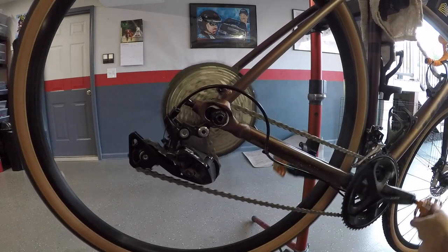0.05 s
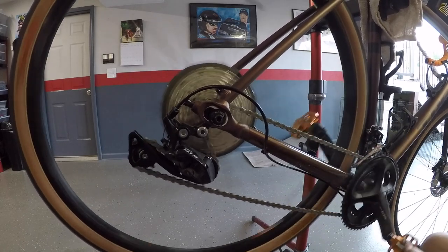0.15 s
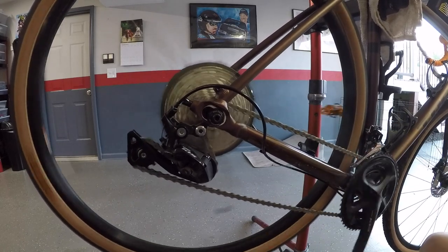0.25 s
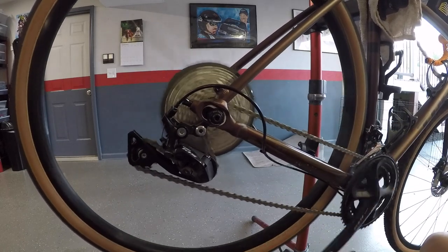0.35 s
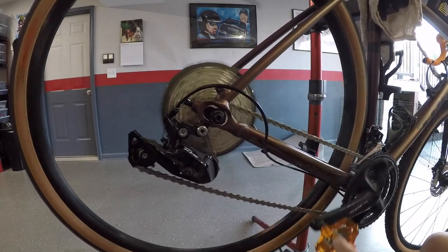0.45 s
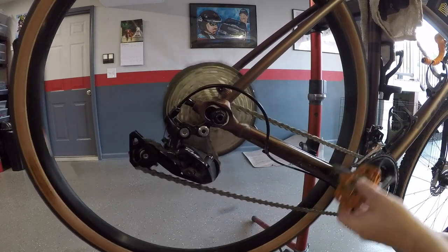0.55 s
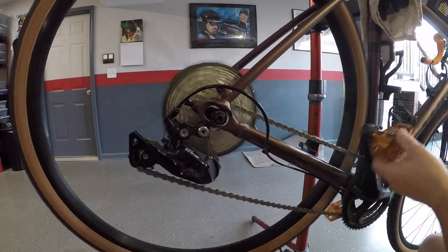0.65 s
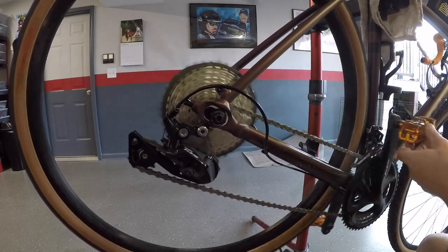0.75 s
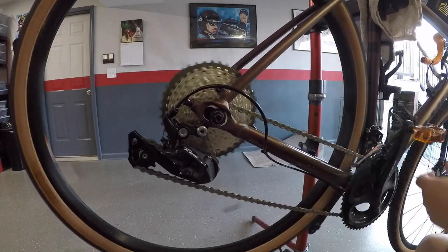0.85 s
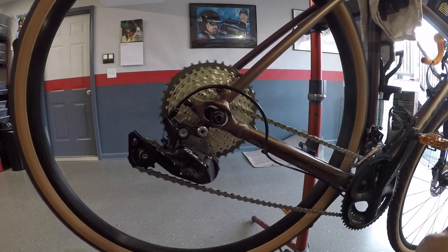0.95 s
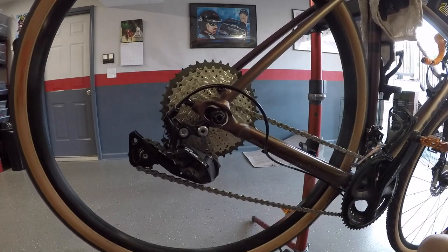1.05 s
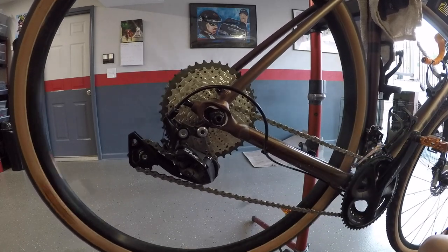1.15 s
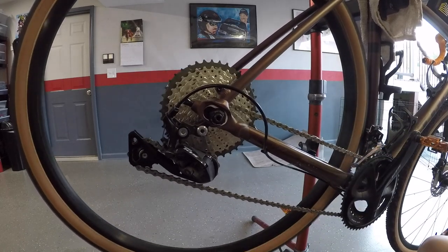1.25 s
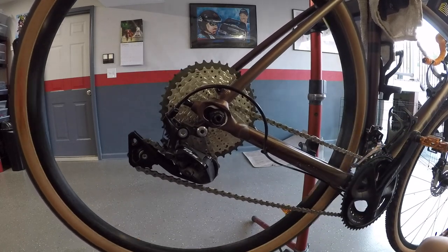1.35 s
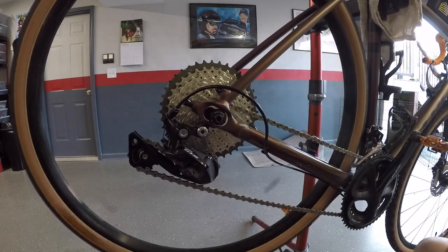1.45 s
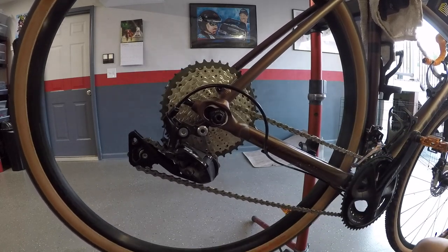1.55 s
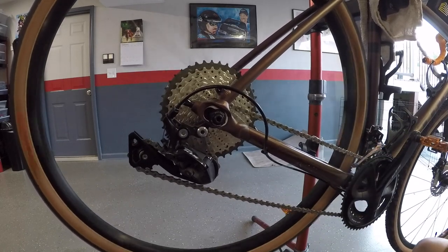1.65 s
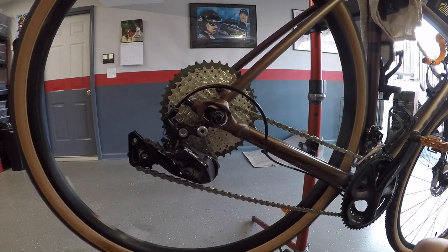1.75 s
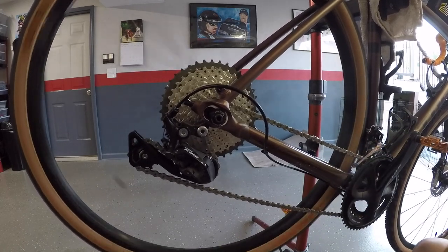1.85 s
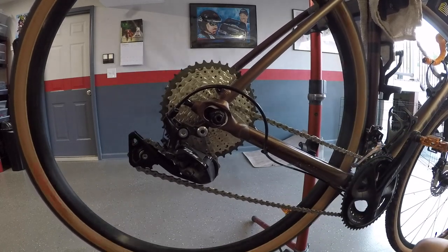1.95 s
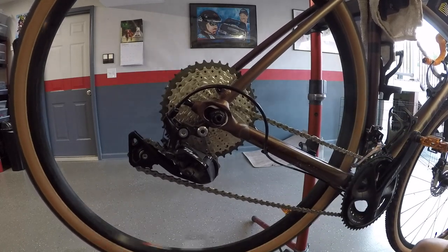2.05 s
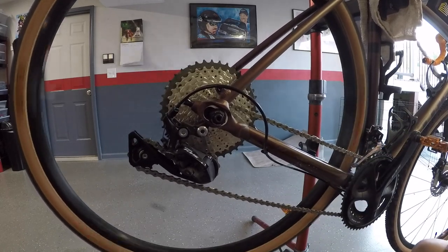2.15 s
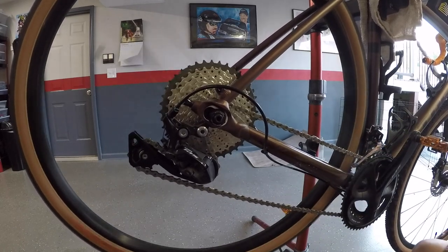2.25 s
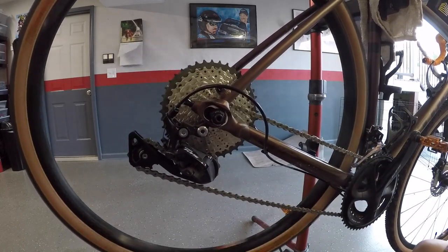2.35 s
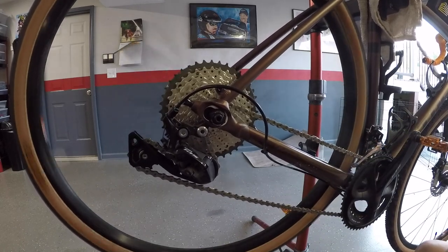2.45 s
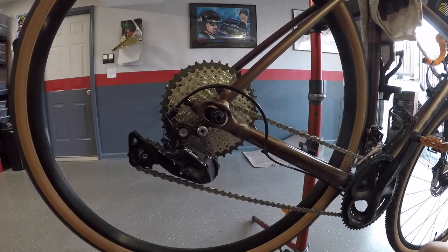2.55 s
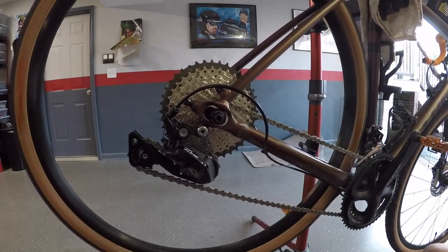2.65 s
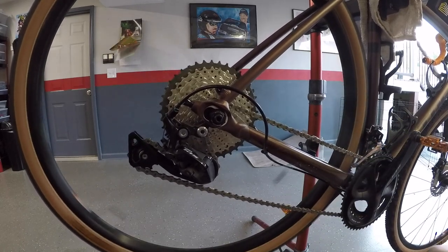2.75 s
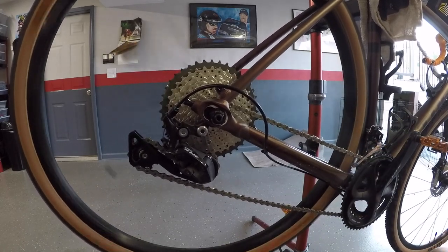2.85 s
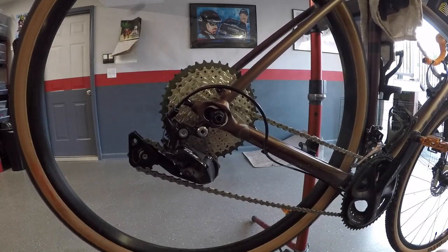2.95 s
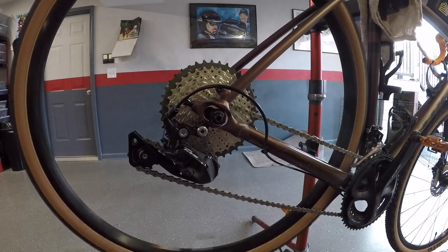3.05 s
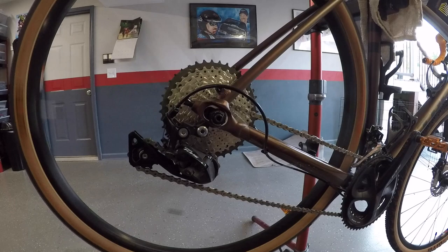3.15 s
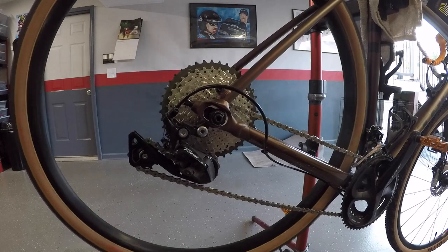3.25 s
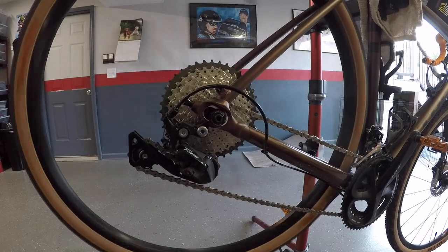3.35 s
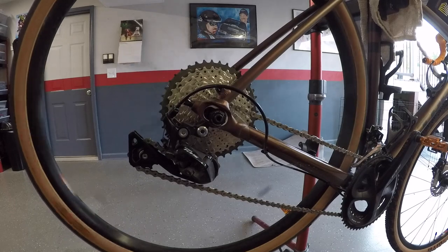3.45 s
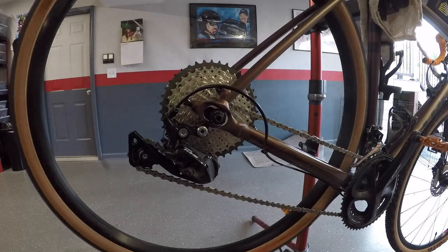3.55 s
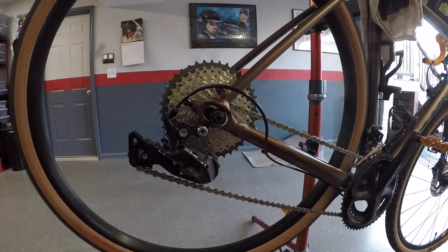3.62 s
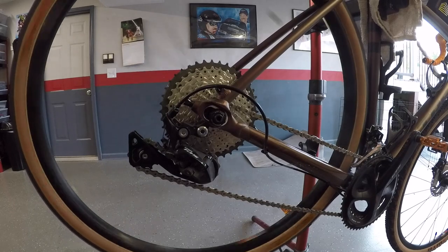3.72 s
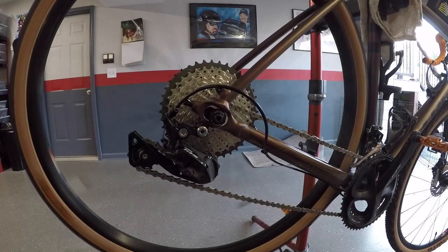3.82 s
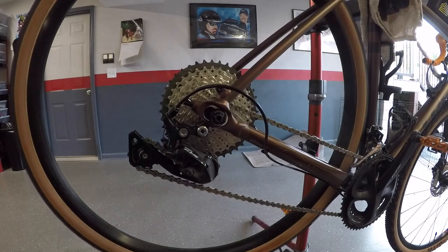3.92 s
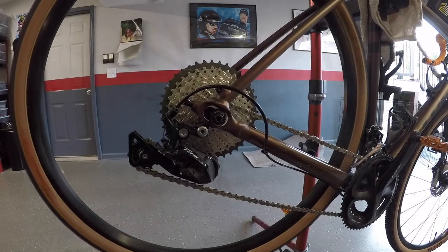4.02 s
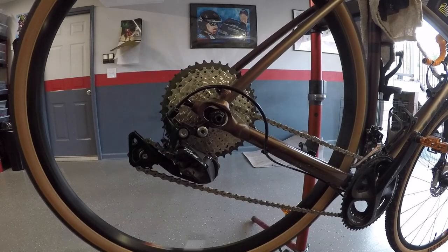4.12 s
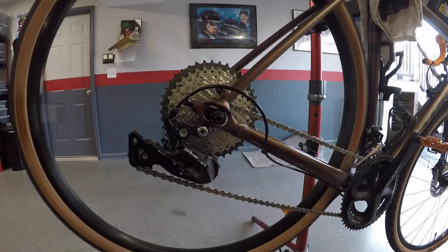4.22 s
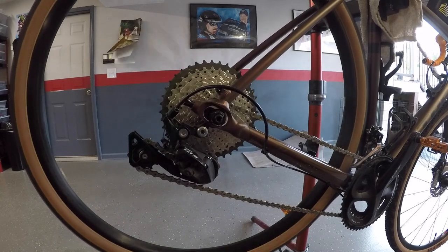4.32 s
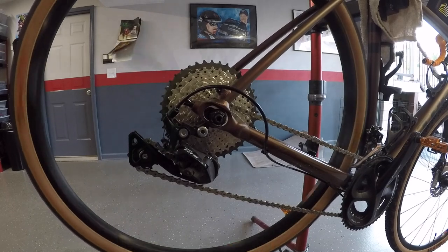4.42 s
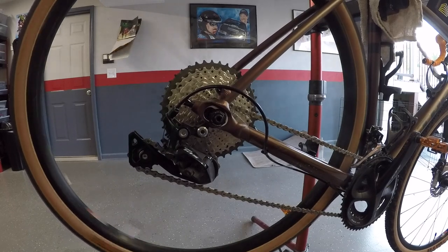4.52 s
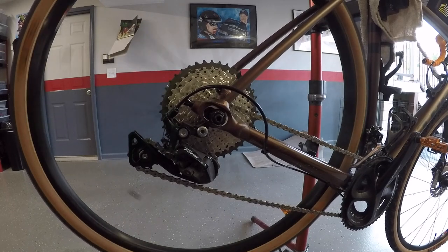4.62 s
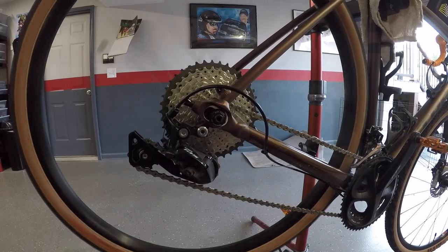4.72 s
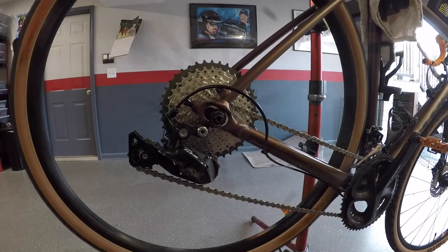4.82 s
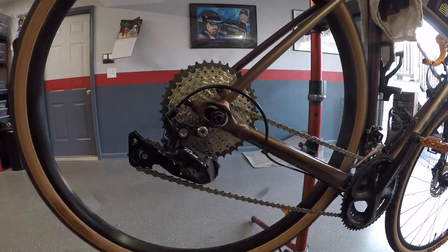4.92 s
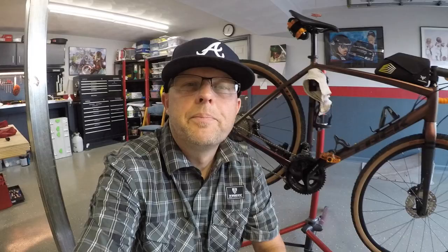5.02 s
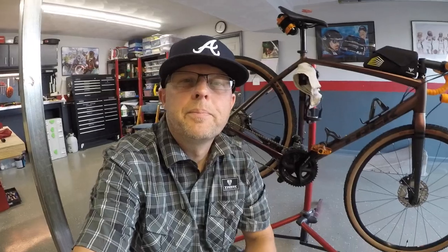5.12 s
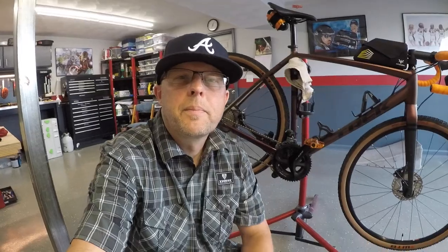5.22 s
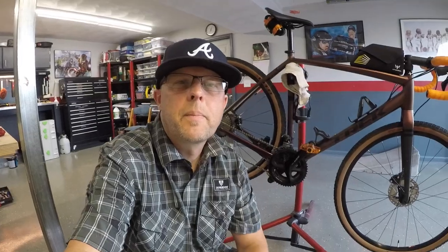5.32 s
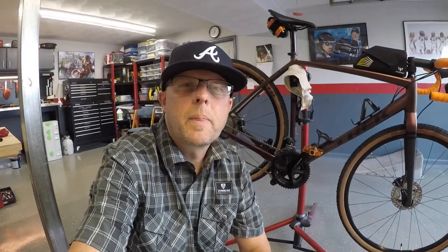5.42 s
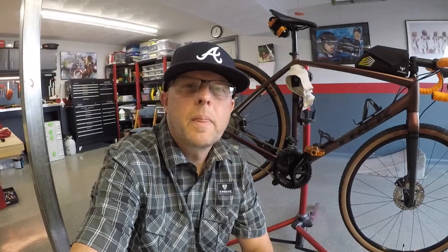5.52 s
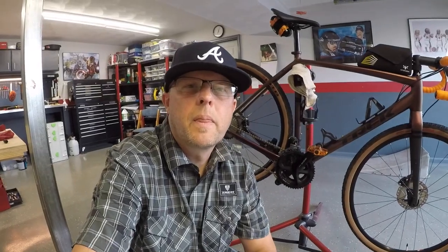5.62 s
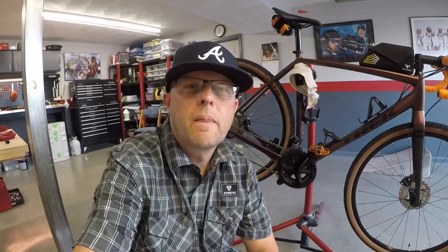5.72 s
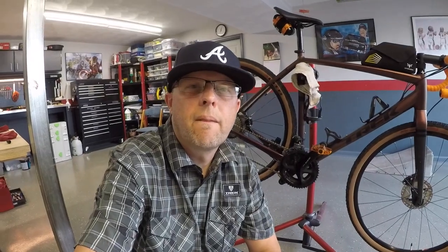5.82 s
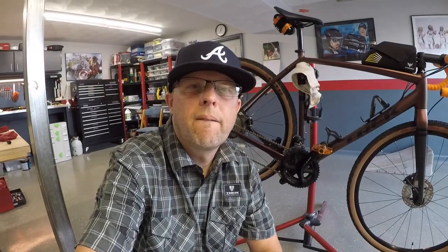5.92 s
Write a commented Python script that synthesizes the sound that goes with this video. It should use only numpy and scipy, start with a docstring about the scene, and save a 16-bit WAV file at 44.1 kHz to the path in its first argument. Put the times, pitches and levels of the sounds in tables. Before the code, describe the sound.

A bicycle is heard close up in a garage, its hard walls adding a short echo. From the start the chain runs with quick, light ticking and a soft rustle, and slack knocks the frame a few times between 0.2 and 0.7 seconds. At about 0.7 seconds the chain dies away and the rear freehub starts clicking, speeding up by 1 second into a bright, metallic ratcheting buzz. The buzz holds steady, slowing only slightly as the wheel coasts. Soft, dull bumps touch the microphone at about 3.2 seconds and again from 3.8 to 4.1, the strongest at 4. A faint draught rumbles in gusts from about 3 seconds on. At 5 seconds the buzz stops dead. After a blink of silence, quiet room air, a faint motor hum, the draught and one tiny bump remain until about 6 seconds.

```python
"""In a garage, a bicycle on a work stand: the crank drives the chain, stops, and the rear wheel coasts.
Three pawls snap off each of 21 ratchet teeth, a slowly falling buzz that rings hub, cassette and spokes.
Chain rollers tick, slack knocks the frame and hard walls answer; a draught and soft bumps reach the
microphone. At five seconds the buzz stops dead; after a blink of silence the quiet garage is left."""
import sys
import numpy as np
from scipy import signal
from scipy.fft import rfft, irfft
from scipy.io import wavfile

SR = 44100
rng = np.random.default_rng(int(sys.argv[2]) if len(sys.argv) > 2 else 0)


def wav_out(sig):
    """Save sig, one row per channel (or a flat mono array), as 16-bit PCM at SR to the path in sys.argv[1]."""
    wavfile.write(sys.argv[1], SR, np.round(np.clip(np.atleast_2d(sig).T, -1, 1) * 32767).astype(np.int16))


N = 263491
T = np.arange(N) / SR

# The bright snap of a pawl. Each row: frequency in Hz, relative gain in dB.
SNAP_EQ = [(300, -32.5), (1000, -29.5), (2000, -18), (3200, -3.5), (4600, -3), (5500, 1), (6000, -5),
           (7500, -7.5), (8600, -0.5), (9400, -3.5), (10800, 3), (12900, -3.5), (13800, 2), (15300, -9.5)]
# The wheel's after-ring. Each row: frequency in Hz, relative gain in dB.
WHEEL_EQ = [(300, -18), (950, -30.5), (1500, -12.5), (2100, -1), (3200, 0), (4600, -1.5), (6000, -7),
            (7500, -9), (10500, -7.5), (15000, -7.5)]
# The ring of hub shell, cassette and disc. Each row: pitch in Hz, width in Hz, relative level in dB.
HUB_RINGS = [(1110, 24, -72), (1295, 24, -73), (1917, 22, -56.5), (2076, 26, -58), (2225, 80, -53),
             (2436, 22, -57), (2635, 50, -55), (3160, 70, -53), (3454, 22, -52), (4170, 50, -54),
             (4580, 190, -43), (4729, 40, -52), (5420, 170, -48.5), (5600, 35, -51), (6283, 30, -59),
             (6725, 16, -60), (8061, 28, -58), (8600, 400, -52), (9720, 80, -55), (9857, 55, -54),
             (10002, 32, -55), (11043, 45, -52), (11420, 80, -54), (12200, 150, -52), (13370, 110, -51),
             (14400, 250, -49.5)]
# The rustle of the running chain. Each row: frequency in Hz, relative gain in dB.
CHAIN_EQ = [(200, -12), (350, 1), (500, -5), (800, -6.5), (1100, -4.5), (1600, -5.5), (2400, -4.5),
            (4300, -2.5), (6000, -10), (7400, -10.5), (11000, -8.5), (15000, -15)]
# The tick of one roller. Each row: frequency in Hz, relative gain in dB.
ROLLER_EQ = [(500, -14), (2000, -2), (3400, -2), (4200, 3), (5900, -3.5), (6500, 1), (7400, -9),
             (8400, 0.5), (10000, 2.5), (11100, 3.5), (11500, -3), (12100, 5), (12700, -11), (14500, -4.5)]
# Drivetrain knocks as the load changes. Each row: start in seconds, strength in dB.
KNOCK_HITS = [(0.216, -46.5), (.432, -56), (.722, -42.5)]
# The knocked frame. Each row: pitch in Hz, gain in dB, seconds to fall 60 dB.
FRAME_MODES = [(580, -10, .09), (640, -3, 0.065), (735, -6, 0.068), (1101, 0, 0.1), (1220, -8, 0.1)]
# Dull bumps on the microphone. Each row: start in seconds, strength in dB, bass weight in dB.
BUMP_HITS = [(3.170, -38, -12), (3.188, -37.5, -6), (3.834, -41.5, -4), (3.889, -37.5, 7),
             (3.999, -26.5, 0.5), (4.095, -33, -20), (5.237, -49, -11)]
# The bumped mount and housing. Each row: pitch in Hz, gain in dB, seconds to fall 60 dB.
HOUSING_MODES = [(54.6, -3, 0.17), (107.4, 0, 0.07), (209, -6, 0.052), (250.3, -9, 0.15), (400, -21, 0.047),
                 (570, -12, 0.03), (765, -17, 0.076)]
# The rumble of the draught. Each row: frequency in Hz, relative gain in dB.
DRAUGHT_EQ = [(15, 8), (30, -6.5), (55, -5), (90, -16.5), (160, -22.5), (300, -39), (800, -65), (3000, -68)]
# Gusts on the microphone. Each row: peak time in seconds, level in dB.
GUST_PEAKS = [(3.25, -45.5), (3.9, -40), (4.6, -43.5), (5.1, -39.5), (5.5, -46), (5.85, -43)]
# The garage's still air. Each row: frequency in Hz, relative gain in dB.
AIR_EQ = [(100, -2.5), (160, -9.5), (320, -10.5), (500, -11), (800, -8.5), (1500, -13.5), (2500, -20.5),
          (4500, -24), (7000, -30.5), (15000, -33.5)]
# A humming motor. Each row: pitch in Hz, level in dB until the buzz stops.
MOTOR_TONES = [(103, -66), (121, -66.5), (208, -66), (249, -75.5)]

FIRST_CLICK_S, BUZZ_END_S, ROOM_RETURN_S = 0.6789, 5.0075, 5.06
TEETH, PAWLS = 21, 3
WHEEL_TEETH_PER_S, DRAG_PER_S = 69.427, 0.055534  # speed at the first click, and how fast it ebbs
CASSETTE_SHARE, CRANK_STOP_S = 0.695, 1.0125  # share of wheel speed at the first click; time of rest
FIRST_LINK_S, LINK_HZ, DRIVE_END_S, LAST_ROLLER_S = 0.0243, 36.47, 0.62, 0.631


def freehub(fade_db_per_s=0.17):
    """The pawls snap and rattle in the hub; the wheel carries each snap on, softer as it slows."""
    times, sizes = pawl_drops()
    blows = taps(times, sizes)
    clicks = times[0], sizes.mean(axis=0)
    snaps = turning_body(*clicks, t60=0.0105, rise=0.0003, alike=0.35)
    snaps += undb(-17) * chatter(blows, decay_s=0.0023)
    shell = turning_body(*clicks, t60=0.023, rise=0.0018, alike=0.074)
    wheel = turning_body(*clicks, t60=0.12, rise=0.002, alike=0.48) * undb(-fade_db_per_s * T)
    rings = sum(level(resonate(blows, hz, width), db) for hz, width, db in HUB_RINGS)
    low_cut = signal.butter(3, 1250, "high", fs=SR)  # the rings carry little below about 1.25 kHz
    rings = undb(-0.5) * signal.lfilter(*low_cut, rings)
    attack = level(colour(snaps + undb(1.5) * shell, SNAP_EQ), -37.5)
    return attack + level(colour(wheel, WHEEL_EQ), -38) + rings


def pawl_drops(stagger_s=0.0009, wobble_s=0.00012, wear_s=0.00005, wear_db=1.96, scatter_db=1.65):
    """Times and sizes of the drops; each tooth is worn its own way, so the pattern loops every turn."""
    passed = teeth_passed()
    click = np.arange(int(np.interp(BUZZ_END_S, T, passed)) + 1)
    late, wear = rng.uniform(-0.91, 1, (TEETH, 2, PAWLS))[click % TEETH].transpose(1, 2, 0)
    pawl = np.arange(PAWLS)[:, None]
    # the off-centre ratchet draws the pawls together and apart, and swells once a turn
    wobble = np.sin(2 * np.pi * (click / TEETH + pawl / PAWLS))
    swell_db = 0.23 * np.cos(2 * np.pi * (click / TEETH - 0.14))
    times = np.interp(click, passed, T) + pawl * stagger_s + wobble_s * wobble + wear_s * late
    speed = np.interp(times, T, np.gradient(passed) * SR) / WHEEL_TEETH_PER_S
    force_db = 0.2 * np.log2(speed) - pawl  # slow teeth land gently; each next pawl is 1 dB softer
    uneven_db = wear_db * wear + scatter_db * rng.standard_normal(times.shape)
    return times, undb(force_db + swell_db + uneven_db)


def teeth_passed():
    """Ratchet teeth passed since the first click: the coasting wheel gains on the stopping cassette."""
    wheel = WHEEL_TEETH_PER_S * np.exp(-DRAG_PER_S * (T - FIRST_CLICK_S))
    cassette = wheel * np.interp(T, [FIRST_CLICK_S, CRANK_STOP_S], [CASSETTE_SHARE, 0])
    passed = np.cumsum(wheel - cassette) / SR
    return passed - np.interp(FIRST_CLICK_S, T, passed)


def turning_body(times, sizes, t60, rise, alike):
    """Each tooth strikes a new spot with its own ring; neighbouring spots share some of their tone."""
    spots = np.array([tail(t60, rise) for _ in range(TEETH)])
    spots = spots + alike * np.roll(spots, 1, axis=0)
    spots /= np.linalg.norm(spots, axis=1, keepdims=True)
    out = np.zeros(N + SR)
    for k, (start, size) in enumerate(zip((times * SR).astype(int), sizes)):
        out[start:start + spots.shape[1]] += size * spots[k % TEETH]
    return out[:N]


def chain(fade_db_per_s=23):
    """Rollers tick onto the chainring; sprocket and pulleys add softer ticks over a greasy rustle."""
    links = np.arange(FIRST_LINK_S, DRIVE_END_S, 1 / LINK_HZ)
    offbeats = links[4::4] + 0.73 / LINK_HZ  # one link in four also ticks between the rollers
    seating = taps(links, undb(-19.5 + rng.standard_normal(len(links))))
    seating += taps(offbeats, np.full(len(offbeats), undb(-19)))
    seating += taps(LAST_ROLLER_S, undb(-19.5))  # the last roller drops as the chain goes slack
    rollers = colour(chatter(seating, decay_s=0.0029), ROLLER_EQ)
    pulley_times = np.arange(0, CRANK_STOP_S, 1 / (3 * LINK_HZ))
    late, size = rng.uniform(-1, 1, (len(pulley_times), 2)).T
    pulleys = chatter(taps(pulley_times + 0.00054 * late, undb(6.4 * size - 26)), decay_s=0.01)
    side_plates = undb(-11) * chatter(seating, decay_s=0.0041)
    rustle = undb(-58) * rng.standard_normal(N)
    sprocket_ring = undb(-1) * resonate(chatter(seating, decay_s=0.0037), hz=4200, width=320)
    run_down = undb(-fade_db_per_s * np.maximum(T - DRIVE_END_S, 0))
    return rollers + sprocket_ring + colour(pulleys + side_plates + rustle, CHAIN_EQ) * run_down


def knocks():
    """Slack in the drivetrain closes and rings the frame."""
    starts, db = np.transpose(KNOCK_HITS)
    frame = sum(undb(gain_db) * mode(hz, t60) for hz, gain_db, t60 in FRAME_MODES)
    return convolve(taps(starts, undb(db)), frame)


def walls(bike):
    """Hard walls throw the bicycle back; air and clutter dull the echoes."""
    echoes = convolve(bike, tail(t60=0.75, rise=0.0039))
    return signal.lfilter(*signal.butter(1, 6000, fs=SR), echoes)


def bumps(rebound_s=0.0169, rebound_db=-12, contact_s=0.0014):
    """Soft bumps ring the housing and rebound once; heavy ones also shake the mount's deep modes."""
    starts, db, weight_db = np.transpose(BUMP_HITS)
    ringing = 0
    for hz, gain_db, t60 in HOUSING_MODES:
        sizes = undb([db, db + rebound_db]) * undb(weight_db * (hz < 150))
        blows = taps([starts, starts + rebound_s], sizes)
        ringing += undb(gain_db) * convolve(blows, mode(hz, t60))
    push = np.sin(np.pi * T[T < contact_s] / contact_s) ** 2
    return convolve(ringing, push / push.sum())


def draught(rise_s=0.13, fall_s=0.29, steady_db=-59.5):
    """Moving air rumbles on the microphone; each gust swells quickly and ebbs more slowly."""
    gusts = [undb(db) * np.exp(-np.maximum((s - T) / rise_s, (T - s) / fall_s)) for s, db in GUST_PEAKS]
    strength = np.sqrt(undb(steady_db) ** 2 + np.sum(np.square(gusts), axis=0))
    return level(colour(rng.standard_normal(N), DRAUGHT_EQ)) * strength


def garage():
    """A bed of still air and a wavering motor hum, which sits lower once the buzz has stopped."""
    air = level(colour(rng.standard_normal(N), AIR_EQ), -61)
    hum = 0
    for hz, db in MOTOR_TONES:
        waver = level(resonate(resonate(rng.standard_normal(N), hz, 14), hz, 14), -6)
        hum += level(np.sin(2 * np.pi * hz * T) + waver, db)
    return air + hum * np.where(T < BUZZ_END_S, 1, undb(-6.5))


def chatter(contacts, decay_s):
    """Each contact becomes a short, fading rattle, never twice alike."""
    decay = decay_s * SR / 2
    power = signal.lfilter([1 / decay], [1, -np.exp(-1 / decay)], contacts ** 2 + 1e-18)
    return np.sqrt(power) * rng.standard_normal(N)


def tail(t60, rise):
    """A wash of modes or echoes that build and die together; times in seconds, unit energy."""
    t = T[T < t60][:SR // 2]
    noise = rng.standard_normal(SR // 2)[:len(t)]
    response = noise * np.exp(-np.log(1000) * t / t60) * (1 - np.exp(-t / rise))
    return response / np.linalg.norm(response)


def mode(hz, t60):
    """One struck, dying tone."""
    t = T[:SR // 4]
    return np.exp(-np.log(1000) * t / t60) * np.sin(2 * np.pi * hz * t)


def taps(times, sizes):
    """One impulse for each contact."""
    samples = np.clip(np.ravel(times) * SR, 0, N).astype(int)
    return np.bincount(samples, np.ravel(sizes), N + 1)[:N]


def resonate(x, hz, width):
    """One resonance, gain 1 at the centre."""
    return signal.lfilter(*signal.iirpeak(hz, hz / width, fs=SR), x)


def colour(x, points, size=8192):
    """Minimum-phase EQ of unit energy through (Hz, dB) points."""
    hz, db = np.transpose(points)
    bins_hz = np.arange(size // 2 + 1) * SR / size
    gain = undb(np.interp(np.log(bins_hz + 1), np.log(hz), db))
    cepstrum = irfft(np.log(gain))
    cepstrum[1:size // 2] *= 2
    cepstrum[size // 2 + 1:] = 0
    response = irfft(np.exp(rfft(cepstrum)))
    return convolve(x, response / np.linalg.norm(response))


def convolve(x, response):
    """Play x through an impulse response."""
    return signal.oaconvolve(x, response)[:N]


def level(x, db=0):
    """Scale to an rms level."""
    return x * undb(db) / np.sqrt(np.mean(x ** 2))


def undb(db):
    """Decibels to gain."""
    return 10 ** (np.asarray(db) / 20)


def scene():
    """The bicycle up front with its echoes, both stopping dead; bumps, draught and room tone behind."""
    bike = freehub() + chain() + knocks()
    foreground = (bike + undb(-6) * walls(bike)) * (T < BUZZ_END_S)
    return (foreground + bumps() + draught() + garage())[None]


def record(dry, fade_in_s=0.0088, top_hz=15250):
    """Everything drops out briefly as the buzz ends; a steep low-pass takes off the very top."""
    gate = (T < BUZZ_END_S) + np.clip((T - ROOM_RETURN_S) / fade_in_s, 0, 1)
    return signal.sosfilt(signal.ellip(10, 0.2, 80, top_hz, fs=SR, output="sos"), dry * gate)


dry = scene()
out = record(dry)
wav_out(out)
```